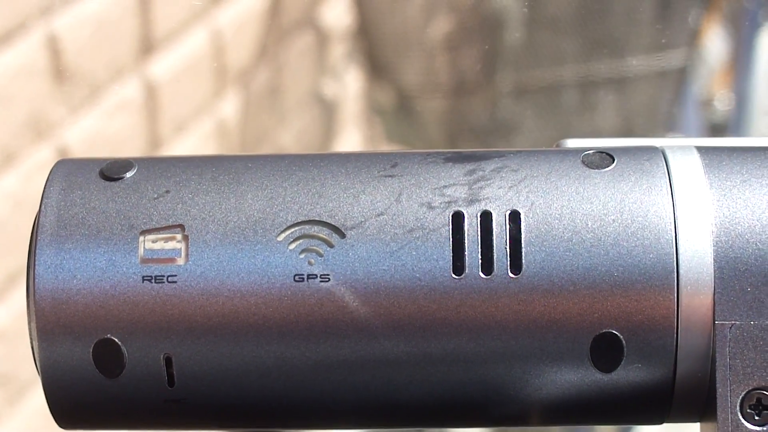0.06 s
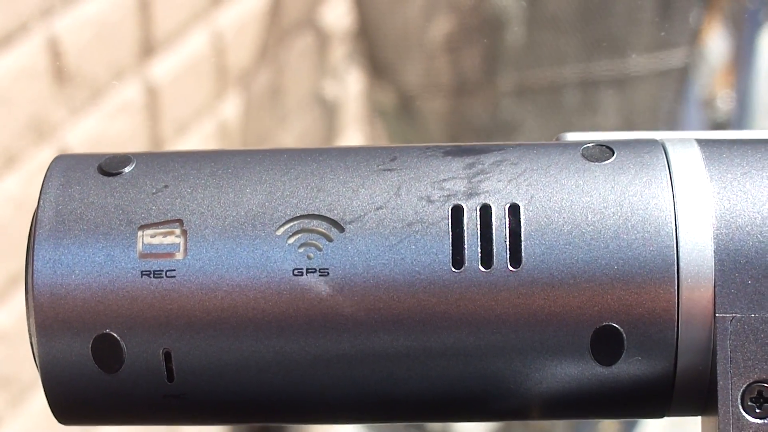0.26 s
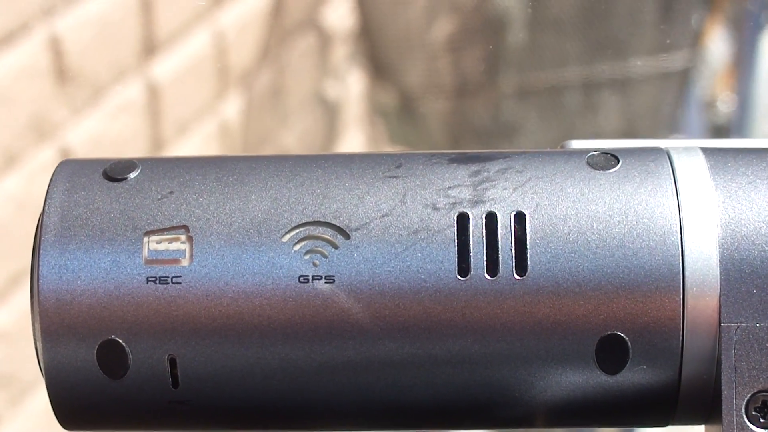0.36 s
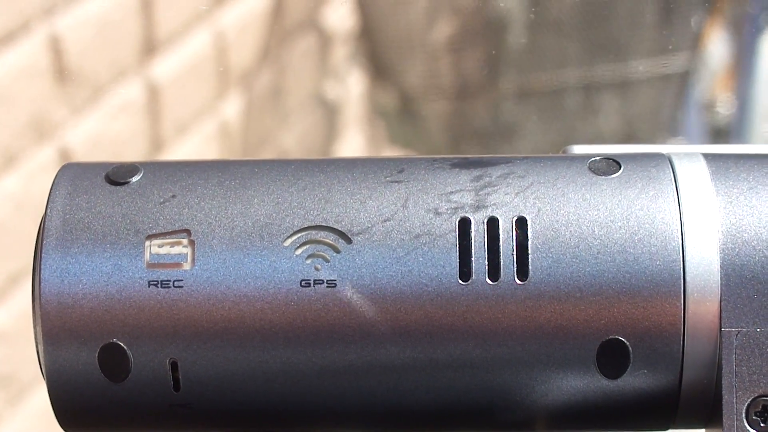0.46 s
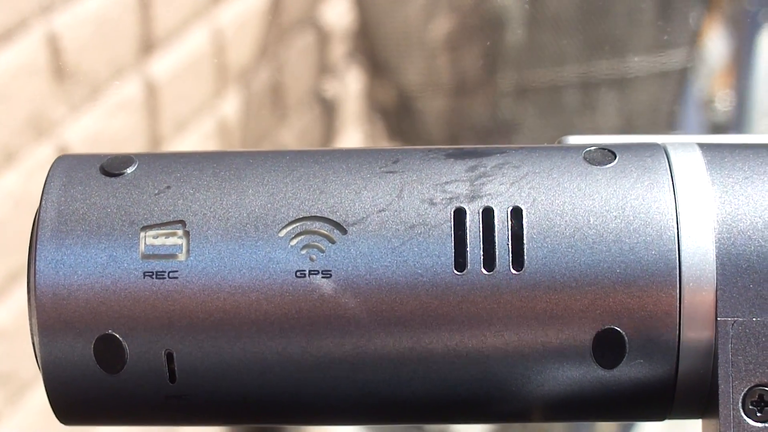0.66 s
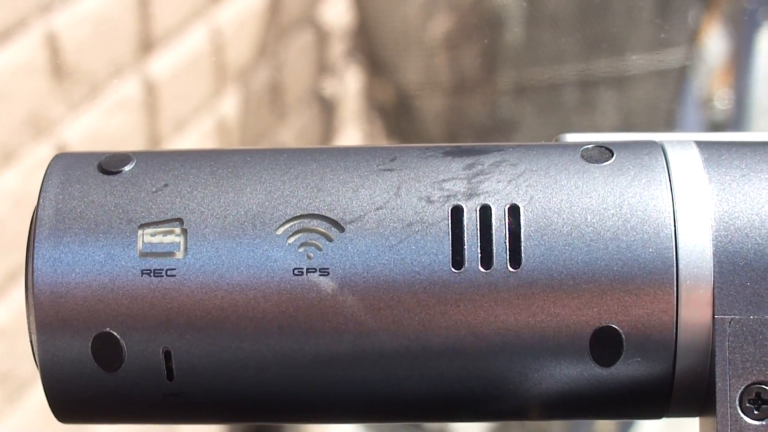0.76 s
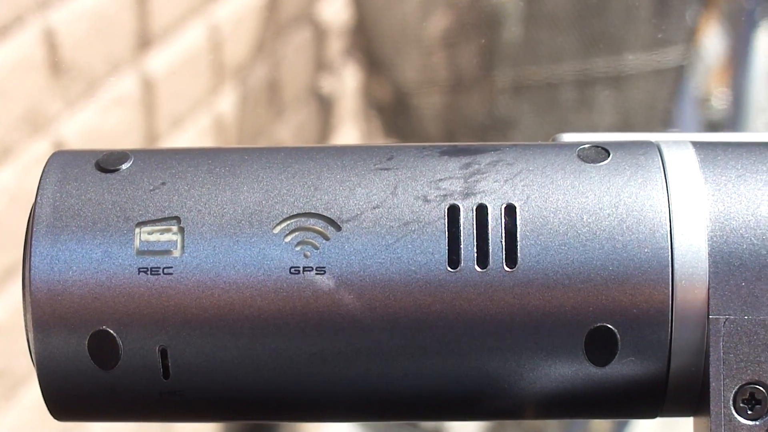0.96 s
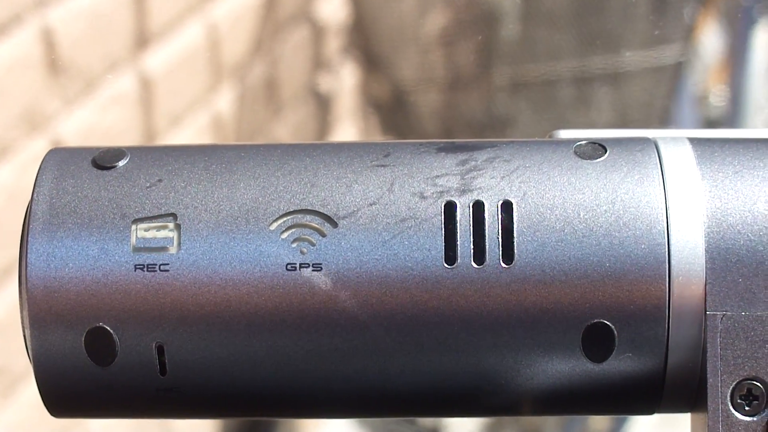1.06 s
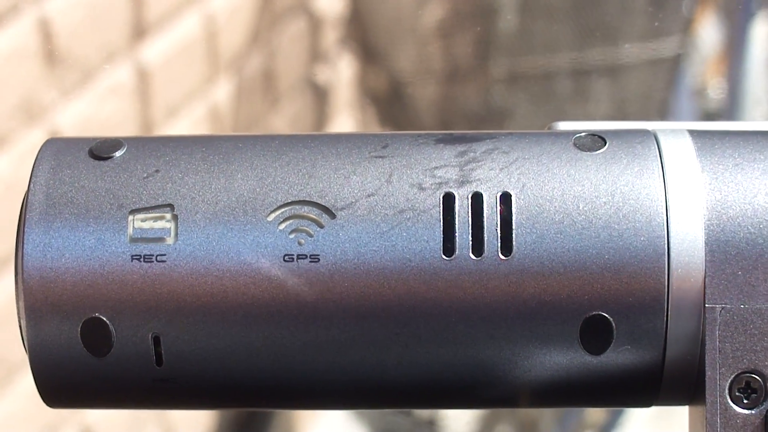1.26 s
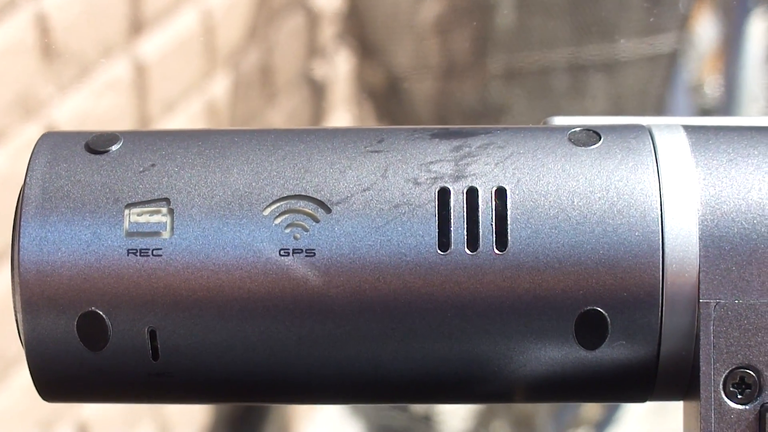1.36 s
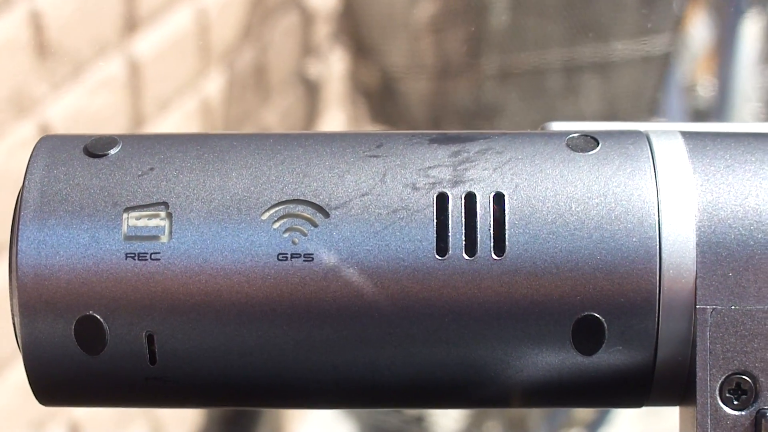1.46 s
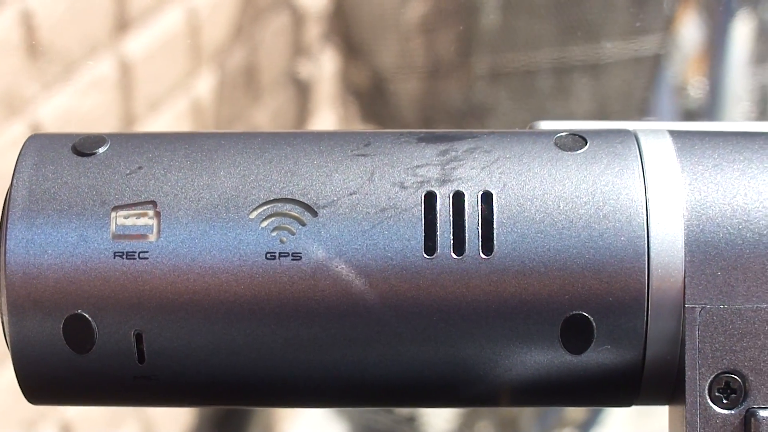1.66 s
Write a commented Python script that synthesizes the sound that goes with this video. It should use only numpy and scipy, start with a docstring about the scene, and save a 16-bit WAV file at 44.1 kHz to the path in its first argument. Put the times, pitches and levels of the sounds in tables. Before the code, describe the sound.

A small plastic button clicks down and snaps back, close by, over faint outdoor traffic.

```python
"""A small plastic button is pressed and snaps back, close to a camera outdoors.
Each click is a quick cluster of contacts that ring the housing and spring and bounce off walls.
Fingers faintly tap and rub the housing. Behind them lies a steady wash of far traffic and air,
in which the low drone of a distant engine swells and a thin, high hiss sets in."""
import sys
import numpy as np
from scipy import signal
from scipy.fft import rfft, irfft
from scipy.io import wavfile
from scipy.ndimage import uniform_filter1d

SR = 44100
rng = np.random.default_rng(int(sys.argv[2]) if len(sys.argv) > 2 else 0)


def generate_wav(sig):
    """Save sig (samples, or channels by samples) to the path in sys.argv[1] as 16-bit PCM at SR."""
    pcm = np.round(np.clip(np.atleast_2d(sig).T, -1, 1) * 32767).astype(np.int16)
    wavfile.write(sys.argv[1], SR, pcm)


N = 74970

# Contacts of the button's press and snap, then faint ticks of fingers on the housing:
# t/s, build-up/s, low thud/dB, middle knock/dB, bright snap/dB
CONTACTS = [ (0.2024, 0.0048, -31, -33, -51), (0.2106, 0.0011, -33, -23.5, -55),
            (.2160, 0.0011, -27.5, -46, -35), (0.2182, .0012, -35, -23.5, -29),
            (.2210, 0.0022, -31, -22, -33.5), (.2300, 0.0036, -34, -25.5, -41.5),
            (.2380, 0.0034, -28.5, -30, -55), (0.2507, 0.003, -27.5, -31.5, -58),
            (.2600, 0.006, -37.5, -39, -68), (.2700, 0.0022, -34.5, -43, -70),
            (0.2839, 0.0012, -60, -36, -61), (.2870, 0.00058, -45, -28.5, -42),
            (0.29, 0.0011, -55, -33, -33), (.2943, 0.00024, -38, -18.5, -16),
            (.2970, 0.0004, -45, -19, -16.5), (.3040, 0.0011, -46, -19.5, -36),
            (.3100, 0.0014, -36.5, -26.5, -42), (0.321, 0.0017, -44, -33, -50),
            (.5950, 0.0049, -50, -42.5, -55), (1.026, 0.0016, -39.5, -45, -57),
            (1.0985, .0005, -56, -45, -60), (1.2845, 0.0012, -65, -44.5, -57),
            (1.339, 0.00069, -59, -57, -56), (1.3458, 0.00038, -48, -41.5, -58),
            (1.35, 0.00038, -59, -50, -53.5), (1.359, .001, -56, -54, -55), (1.3720, 0.0013, -56, -55, -59),
            ]
# Tone colour of the bright snap and of the fingers' hiss: f/Hz, relative level/dB
SNAP_COLOUR = [(100, -65), (2500, -29), (3300, -6.5), (4300, -15.5), (4900, -29.5), (5600, -9.5), (6700, 0),
               (7900, -2.5), (9100, -6), (10200, -11), (11300, -31.5), (12200, -41), (13500, -56),
               (14600, -34), (15600, -21), (16500, -47)]
CLICK_PAN_DB = 1.5  # left louder than right


def undb(db):
    """Turn decibels into a gain."""
    return 10 ** (np.asarray(db) / 20)


def unit(x):
    """Scale to an energy of one."""
    return x / np.sqrt(np.sum(x ** 2) + 1e-18)


def on_bins(points):
    """Spread (f/Hz, value) points over the frequencies of a double-length spectrum."""
    hz, value = np.array(points, float).T
    return np.interp(np.log(np.arange(N + 1) * SR / (2 * N) + 1), np.log(hz), value)


def colour(x, points):
    """Filter a sound by a curve of (f/Hz, gain/dB) points."""
    cepstrum = irfft(np.log(undb(on_bins(points))))
    cepstrum[1:N] *= 2  # folded so that the filter never rings ahead of the sound
    cepstrum[N + 1:] = 0
    return irfft(rfft(x, 2 * N) * np.exp(rfft(cepstrum)))[:N]


def noise(points):
    """Steady noise with the given tone colour and a power of one."""
    return unit(colour(rng.standard_normal(N), points)) * np.sqrt(N)


def convolve(x, response):
    """Pass a sound through a response, keeping its length."""
    return signal.fftconvolve(x, response)[:len(x)]


def fade(t60):
    """A decay that falls by 60 dB in t60 seconds."""
    return np.exp(-np.log(1000) * np.arange(N) / SR / max(t60, 1e-3))


def wander(per_s):
    """A smooth random wobble with a typical size of one."""
    hold = int(SR / per_s)
    steps = np.repeat(rng.standard_normal(N // hold + 1), hold)
    smooth = uniform_filter1d(uniform_filter1d(steps, hold), hold)[:N]
    return smooth / smooth.std()


def stereo(mid, side, pan_db):
    """Make left and right from what they share (mid) and what sets them apart (side)."""
    return np.array([mid + side, mid - side]) * undb(np.array([[pan_db], [-pan_db]]) / 2)


def outdoors(level_db=-44):
    """Far traffic and air blend into a steady wash, wider in the treble."""
    # Tone colour of the wash: f/Hz, relative level/dB
    wash_colour = [(20, -55), (40, -28.5), (65, -27), (90, -17), (135, -7.5), (175, -4.5), (260, -4.5),
                   (400, -4), (740, -5), (1000, -7.5), (1700, -11.5), (2290, -16.5), (2700, -28),
                   (3400, -36.5), (4900, -38.5), (6000, -31), (7200, -32.5), (9200, -37), (11000, -46.5),
                   (12200, -76), (13500, -69), (14800, -52), (15700, -47), (16500, -60)]
    # Stereo width: f/Hz, side over mid
    widths = [(60, 0.066), (150, 0.25), (400, 0.4), (2000, 0.53), (7000, 0.96), (15000, 1)]
    mid, side = noise(wash_colour), noise(wash_colour)
    side = irfft(rfft(side, 2 * N) * on_bins(widths))[:N]
    return stereo(mid, side, pan_db=1) * undb(level_db)


def high_hiss(start_s=1.087, level_db=-80.5, flutter_db=4):
    """A thin, very high hiss sets in and flutters in level."""
    # Tone colour of the hiss: f/Hz, relative level/dB
    hiss_colour = [(8000, -30), (11500, -8), (12800, -20), (13600, -27), (14800, -15), (15700, 2),
                   (16500, -21)]
    t = np.arange(N) / SR
    hiss = stereo(noise(hiss_colour), noise(hiss_colour), pan_db=0)
    return hiss * (t > start_s) * undb(level_db + flutter_db * wander(per_s=40))


def engine(hum_hz=284.8, hum_db=-55, hum_fade_in_s=0.46):
    """A distant engine's drone and rumble swell; a faint higher hum fades in and wavers."""
    # Course of the engine: t/s, f/Hz, drone level/dB, rumble level/dB
    course = [(0, 114.2, -72, -70), (0.748, 112.4, -67, -57), (.93, 109.4, -49, -49.5),
              (1.02, 109.3, -51.5, -52.5), (1.18, 112.7, -46.5, -59), (1.25, 115.6, -47, -62),
              (1.32, 116.4, -42.5, -49), (1.5, 117.2, -46, -55.5), (1.7, 110.5, -45, -49.5)]
    # Tone colour of the rumble: f/Hz, relative level/dB
    rumble_colour = [(40, -39), (75, -9), (100, -4), (135, 8.5), (165, -17.5), (205, 8.5), (260, -10),
                     (600, -52), (3000, -94)]
    t = np.arange(N) / SR
    at, hz, drone_db, rumble_db = np.array(course).T
    tone = lambda f: np.sqrt(2) * np.sin(2 * np.pi * np.cumsum(f) / SR)
    drone = tone(np.interp(t, at, hz)) * undb(np.interp(t, at, drone_db))
    rumble = noise(rumble_colour) * undb(np.interp(t, at, rumble_db))
    hum = tone(hum_hz * (1 + 0.0059 * wander(per_s=14.52)))
    hum *= undb(hum_db + 0.5 * wander(per_s=9.78))
    return drone + rumble + hum * np.minimum(t / hum_fade_in_s, 1)


def finger_rubs(grain_db=-0.5):
    """Fingers brush the housing, making a grainy hiss and a lower scrape."""
    # Rubs: middle t/s, length/s, hiss level/dB, scrape level/dB
    rubs = [(0.595, 0.011, -60.5, -60), (1.039, 0.026, -61.5, -75), (1.263, 0.031, -66, -54),
            (1.305, 0.031, -57.5, -78), (1.359, 0.031, -59.5, -50), (1.396, 0.037, -63, -49)]
    # Tone colour of the scrape: f/Hz, relative level/dB
    scrape_colour = [(200, -22), (1000, -6.5), (1800, -5.5), (2250, -2.5), (2700, -12.5), (3300, -53),
                     (5000, -21), (16000, -78)]
    t, out = np.arange(N) / SR, 0
    grain = undb(grain_db * wander(per_s=250))
    for column, spectrum in enumerate([SNAP_COLOUR, scrape_colour]):
        touch = sum(undb(db[column]) * np.exp(-2 * ((t - at) / span) ** 2) for at, span, *db in rubs)
        out += stereo(noise(spectrum), noise(spectrum), pan_db=-1) * touch * grain
    return out


def finger_taps(attack_s=0.001):
    """Each light tap on the housing rings one tone that quickly dies."""
    # Taps: t/s, f/Hz, fade time/s, level/dB
    taps = [(.598, 466, 0.067, -33.5), (1.0985, 6260, .008, -44.5), (1.346, 2320, 0.01, -28)]
    out = 0
    for at, hz, t60, db in taps:
        age = np.maximum(np.arange(N) / SR - at, 0)
        envelope = np.minimum(age / attack_s, 1) * np.exp(-np.log(1000) * age / t60)
        out += undb(db) * envelope * np.sin(2 * np.pi * hz * age)
    return stereo(out, 0, pan_db=1)


def far_walls(click, width=0.2):
    """Walls farther off send back late, dull, smeared echoes."""
    # Echoes: delay/s, fade time/s, level before the tone filter/dB
    echoes = [(0.084, .3, -18), (.117, .06, -20), (.13, .4, -20)]
    # Tone filter of the walls: f/Hz, gain/dB
    wall_colour = [(200, -1), (1000, -5), (1600, -0.5), (2300, 7.5), (3300, -10), (5500, -5.5), (7500, -26),
                   (11000, -31), (16000, -24)]
    t, mid_side = np.arange(N) / SR, np.zeros((2, N))
    dull = colour(click, wall_colour)
    for channel in mid_side:
        for delay, t60, db in echoes:
            tail = rng.standard_normal(N) * np.interp(t - delay, t, fade(t60), left=0)
            channel += convolve(dull, undb(db) * unit(tail))
    return stereo(mid_side[0], width * mid_side[1], CLICK_PAN_DB / 2)


def near_walls(body, snap, width=0.45):
    """Nearby surfaces scatter the click's low body and bright snap into fading tails."""
    # Echoes: delay/s, fade time/s, body level/dB, snap level/dB
    echoes = [(.006, 0.107, -13.5, -11.5), (0.027, 0.486, -24.5, -24)]
    t, mid_side = np.arange(N) / SR, np.zeros((2, N))
    for column, sound in enumerate([body, snap]):
        for channel in mid_side:
            for delay, t60, *db in echoes:
                tail = rng.standard_normal(N) * fade(t60) * (t > delay)
                channel += convolve(sound, undb(db[column]) * unit(tail))
    return stereo(mid_side[0], width * mid_side[1], CLICK_PAN_DB / 2)


def ring(tones):
    """A struck part rings at its own tones, each dying at its own pace."""
    t = np.arange(N) / SR
    return unit(sum(undb(db) * fade(t60) * np.sin(2 * np.pi * (hz * t + rng.random()))
                    for hz, db, t60 in tones))


def rattle(envelope, smooth_hz=120):
    """A burst of dying noise, evened out so that it holds all frequencies alike."""
    size = len(envelope)
    bins = rfft(rng.standard_normal(size) * envelope)
    power = uniform_filter1d(np.abs(bins) ** 2, max(1, int(smooth_hz * size / SR)))
    return irfft(bins / np.sqrt(power + 1e-12)) * np.linspace(1, 0, size) ** 2


def strikes(levels_db, spectrum, t60, tones=None, tones_db=0, size=8192):
    """Each contact sets off a short rattle and any clear tones of the part; gives mid and side."""
    response = colour(signal.unit_impulse(N), spectrum)[:size]
    shaped = lambda x: unit(convolve(x, response))
    ringing = ring(tones)[:size] if tones else np.zeros(size)
    decay = fade(t60)[:size]
    t, out = np.arange(size) / SR, np.zeros((2, N + size))
    for (at, build_s, *_), db in zip(CONTACTS, levels_db):
        start = int(at * SR)
        push = np.minimum(t / build_s, 1) ** 2
        mid, side = (shaped(rattle(push * decay)) for _ in range(2))
        clear = undb(tones_db) * shaped(push * ringing)
        gain = undb(db) * np.sqrt(0.003 * SR)  # as much energy as this level held for 3 ms
        out[:, start:start + size] += gain * np.array([unit(mid + clear), side])
    return out[:, :N]


def button(body_width=0.13):
    """Clicks and finger ticks make the housing thud and knock and the spring snap; walls echo them."""
    # Tone colours of the thud and the knock: f/Hz, relative level/dB
    thud_colour = [(40, -75), (130, -25.5), (220, -8.5), (315, 6), (480, 0), (800, -9), (2000, -86),
                   (16000, -104)]
    knock_colour = [(60, -54), (350, -19.5), (700, -0.5), (1200, 1), (1750, 0), (2300, -5), (2800, -19.5),
                    (3400, -21.5), (4200, -28.5), (9000, -18), (13000, -57)]
    # Ringing tones of the housing and the spring: f/Hz, relative level/dB, fade time/s
    housing = [(624, 0, 0.049), (709, 1, 0.071), (827, -4, 0.08), (966, -5, 0.074), (1050, 1, 0.094),
               (1175, -1, 0.057), (1276, -1, 0.046), (1354, -3.5, 0.053), (1536, -0.5, 0.059),
               (1628, -1.5, 0.042), (1730, 3.5, 0.039), (2205, -0.5, 0.042)]
    spring = [(6600, -17, 0.032), (6570, 5, .025), (6737, 11, 0.028), (7297, 8.5, 0.035),
              (8100, -10, 0.036), (8530, 4.5, 0.04), (9340, 9, 0.036)]
    # Stereo width of the snap: f/Hz, side over mid/dB
    snap_width = [(4000, -13), (7000, -9.5), (9000, -5), (11000, -2), (15000, 6)]
    _, _, thud_db, knock_db, snap_db = np.array(CONTACTS).T
    thud = strikes(thud_db, thud_colour, t60=0.056)
    knock = strikes(knock_db, knock_colour, t60=0.02, tones=housing, tones_db=-2.5)
    snap, snap_side = strikes(snap_db, SNAP_COLOUR, t60=0.014, tones=spring, tones_db=-2)
    body, body_side = thud + knock
    side = body_width * body_side + colour(snap_side, snap_width)
    direct = stereo(body + snap, side, CLICK_PAN_DB)
    return direct + near_walls(body, snap) + far_walls(body + snap)


def scene():
    """Clicks and finger sounds in front of the outdoor background."""
    return button() + finger_taps() + finger_rubs() + outdoors() + engine() + high_hiss()


def record(dry, top_hz=16200):
    """The camera dips three narrow bands in the upper middle range and cuts the highest treble."""
    # Microphone dips: f/Hz, width/Hz
    dips = [(3000, 545), (4030, 840), (4980, 610)]
    for hz, width in dips:
        dry = signal.lfilter(*signal.iirnotch(hz, hz / width, fs=SR), dry)
    return signal.sosfilt(signal.ellip(10, 0.2, 80, top_hz, fs=SR, output="sos"), dry)


dry = scene()
out = record(dry)
generate_wav(out)
```